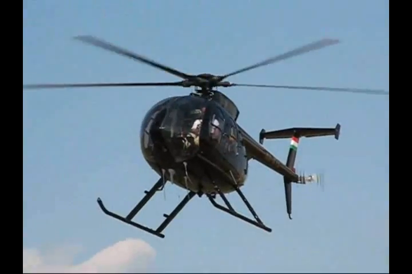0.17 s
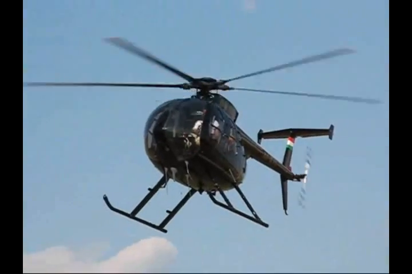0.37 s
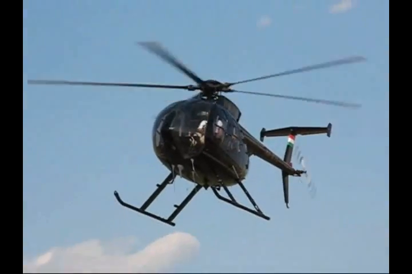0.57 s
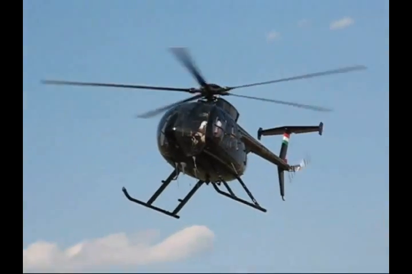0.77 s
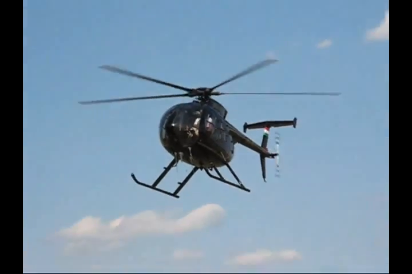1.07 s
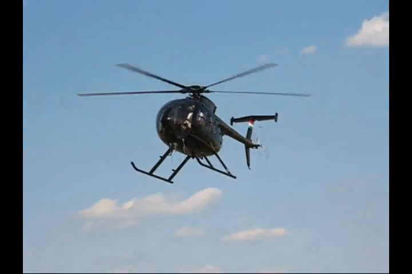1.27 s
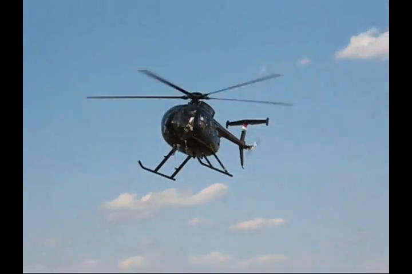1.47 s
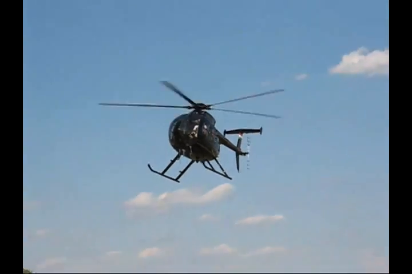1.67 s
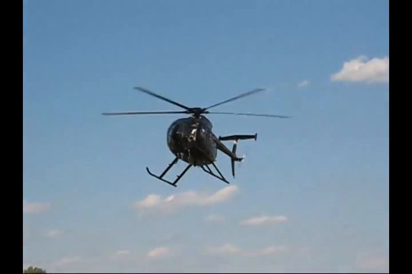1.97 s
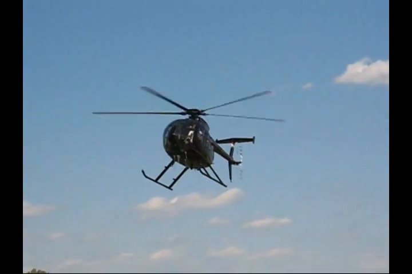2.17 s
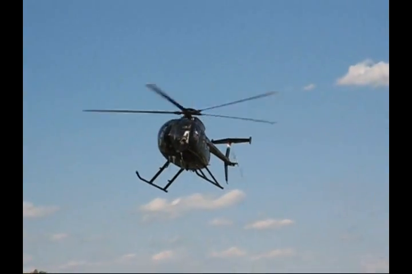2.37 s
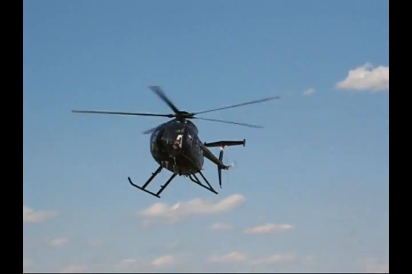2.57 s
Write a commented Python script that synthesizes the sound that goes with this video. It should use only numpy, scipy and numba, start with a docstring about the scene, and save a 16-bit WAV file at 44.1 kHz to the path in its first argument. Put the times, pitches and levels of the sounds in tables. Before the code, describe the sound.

Continuous rapid helicopter chopping in open air, with uneven hard slaps, a low tail drone and dry crackling buzz; after one second wind rumbles on the left of a small camera microphone, and turbine hiss rises.

```python
"""Hovering turbine helicopter

A light helicopter some tens of metres away is heard at the two microphone ports of a hand-held camera.
Main blades swish, trail torn wake and slap: gated noise and filtered spikes. The tail rotor adds a
cosine drone, gated noise buzz and cracks. The turbine is fluttering noise whose hiss grows as it turns.
Gusts are low-passed noise, separate for each port and strongest on the left.
"""
import sys
import numpy as np
from scipy import signal
from scipy.fft import rfft, irfft, next_fast_len
from scipy.io import wavfile
from scipy.ndimage import uniform_filter1d
from numba import njit

SR = 44100
rng = np.random.default_rng(int(sys.argv[2]) if len(sys.argv) > 2 else 0)


def rack_gain(trim_db):
    """Turn a fader trim in dB into the linear factor to multiply a signal by."""
    fader = np.asarray(trim_db, float)
    return 10 ** (fader / 20)


def master_out(mix):
    """Clip the mix to full scale and print it as 16-bit PCM to the path in sys.argv[1]."""
    frames = np.transpose(np.atleast_2d(mix))
    ceiling = np.clip(frames, -1, 1)
    pcm = np.round(ceiling * 32767).astype(np.int16)
    wavfile.write(sys.argv[1], SR, pcm)


N = 120834
T = np.arange(N) / SR


def unit(x):
    """Scale to rms 1."""
    return x / np.sqrt(np.mean(x ** 2))


def curve(table, column):
    """Join a table column by straight lines in time."""
    rows = np.array(table)
    return np.interp(T, rows[:, 0], rows[:, column])


def shape(x, table):
    """Filter by (Hz, dB) points, log-spaced in frequency; -60 dB outside them."""
    size, rows = next_fast_len(N), np.array(table, float)
    hz = np.arange(size // 2 + 1) * SR / size + 1
    gain_db = np.interp(np.log(hz), np.log(rows[:, 0]), rows[:, 1], left=-60, right=-60)
    return irfft(rfft(x, size) * rack_gain(gain_db), size)[:N]


@njit
def svf(x, hz, width):
    """State-variable filter with moving centre: band (gain 1) and low outputs."""
    band, low, b, l = np.empty(len(x)), np.empty(len(x)), 0., 0.
    for i in range(len(x)):
        g, k = np.tan(np.pi * hz[i] / SR), width[i] / hz[i]
        v = (b + g * (x[i] - l)) / (1 + g * (g + k))
        low[i], band[i] = l + g * v, k * v
        b, l = 2 * v - b, l + 2 * g * v
    return band, low


def walk(rate_hz):
    """Random values held 1 / rate_hz seconds and slewed; rms 1."""
    k = int(SR / rate_hz)
    held = np.repeat(rng.standard_normal(2 * N // 100), k)[:N]
    return unit(uniform_filter1d(uniform_filter1d(held, k), k))


def hump(t, rise_s, fall_s):
    """Bell-shaped rise to t = 0, exponential fall after."""
    return np.where(t < 0, np.exp(-.5 * (t / rise_s) ** 2), np.exp(-np.abs(t) / fall_s))


def passes(turns, rise_s, fall_s, scatter_db, jitter_s):
    """Envelope with one hump per blade pass, each a little early or late, weak or strong."""
    times = np.interp(np.arange(0, turns[-1]), turns, T)
    chance = np.clip(rng.standard_normal((400, 2)), -1.6, 1.6)[:len(times)]
    at = np.clip(((times + jitter_s * chance[:, 0]) * SR).astype(int), 0, N - 1)
    ticks = np.bincount(at, rack_gain(scatter_db * chance[:, 1]), N)
    return signal.fftconvolve(ticks, hump(np.arange(-1500, 1501) / SR, rise_s, fall_s), "same")


def grainy(mean_db):
    """Turbulent noise with sparse strong grains: exponentially distributed dB boosts."""
    return rng.standard_normal(N) * rack_gain(mean_db * rng.exponential(size=N))


def cracks(table, q, rise_s, fall_s, noise_db, spike_s, late_s):
    """Pressure spike inside a short puff of turbulence, ringing two band filters near each row's pitch."""
    out, t = np.zeros(N), np.arange(-200, 500) / SR
    for (s, db, hz), noise in zip(table, rng.standard_normal((len(table), len(t)))):
        puff = rack_gain(noise_db) * noise * hump(t, rise_s, fall_s)
        push = puff + 5 * hump(t, spike_s, spike_s / 2)
        centre = np.full(len(t), 1. * hz)
        first = svf(push, centre, centre / q)[0]
        crack = svf(first, 1.17 * centre, 1.66 * centre / q)[0]
        at = max(int((s + late_s) * SR) - 200, 0)
        out[at:at + len(t)] += (rack_gain(db) * crack / np.abs(crack).max())[:N - at]
    return out


# Source levels, shared by turbine, buzz and swish. Each row: time in seconds, main blade swish in dB rms
# before the blade high-pass, tail buzz in dB rms, turbine roar in dB rms, turbine hiss in dB rms.
SOURCE_LEVELS = [(0, -17.5, -18.5, -30, -36), (.1, -27.5, -42.5, -26, -40.5), (.23, -23, -28, -27, -34.5),
                 (.42, -26.5, -28.5, -29.5, -43), (.55, -20.5, -33.5, -25.5, -34),
                 (.66, -24, -20.5, -27.5, -32), (.77, -23.5, -31, -30, -38), (.87, -22, -25.5, -25, -30.5),
                 (.97, -25.5, -34, -27, -35), (1.07, -24.5, -24, -28, -32),
                 (1.27, -26.5, -28.5, -27.5, -31.5), (1.4, -25.5, -24, -25.5, -32.5),
                 (1.5, -28, -29, -25.5, -31), (1.65, -34, -21, -23.5, -23.5), (1.8, -31, -31, -23.5, -31),
                 (1.97, -25, -26, -28, -30), (2.06, -20.5, -23, -25, -23.5), (2.13, -23, -26.5, -27.5, -30),
                 (2.25, -23.5, -24, -27, -24), (2.41, -23.5, -23, -23, -25),
                 (2.56, -23.5, -29.5, -21.5, -31.5), (2.68, -28.5, -29, -23, -24.5),
                 (2.74, -20, -34, -23, -24.5)]
# Roar spectrum. Each row: frequency in Hz, relative density in dB per Hz.
ROAR_SPECTRUM = [(18, -42), (30, -23), (120, -8.5), (400, -8.5), (800, -6), (1200, -6), (2540, -6),
                 (5000, -17.5), (9800, -35.5), (11500, -64), (13000, -98)]
# Exhaust hiss spectrum. Each row: frequency in Hz, relative density in dB per Hz.
HISS_SPECTRUM = [(2500, 2), (4000, -2), (6300, 2), (8000, -4.5), (10500, -7), (12500, -25)]


def turbine():
    """Broad roar and high exhaust hiss, both fluttering in the downwash."""
    roar = unit(shape(grainy(1.0) * rack_gain(1.54 * walk(18.0)), ROAR_SPECTRUM))
    hiss = unit(shape(grainy(3.7) * rack_gain(0.79 * walk(60.)), HISS_SPECTRUM))
    return roar * rack_gain(curve(SOURCE_LEVELS, column=3)) + hiss * rack_gain(curve(SOURCE_LEVELS, column=4))


# Wind on each port. Each row: time in seconds, level in dB rms over 50 ms,
# nominal top of the rumble in Hz.
LEFT_GUSTS = [(0, -36.5, 203), (.17, -29, 179), (.35, -35, 198), (.4, -23.5, 171), (.47, -22.5, 573),
              (.55, -28.5, 252), (.72, -33, 205), (.82, -26, 334), (.95, -28, 322), (.99, -34, 304),
              (1.015, -11, 393), (1.06, -22.5, 317), (1.12, -17.5, 400), (1.2, -24.5, 127), (1.3, -25, 306),
              (1.355, -16.5, 262), (1.39, -23.5, 332), (1.42, -12.5, 520), (1.46, -16, 480),
              (1.49, -21, 303), (1.6, -35.5, 195), (1.67, -28, 200), (1.695, -12, 298), (1.725, -22, 400),
              (1.77, -15, 540), (1.83, -14, 400), (1.89, -27.5, 200), (1.95, -22, 230), (1.965, -27, 250),
              (1.99, -12, 328), (2.04, -23.5, 402), (2.085, -19.5, 503), (2.105, -28, 450),
              (2.13, -17, 480), (2.18, -19, 520), (2.27, -21.5, 600), (2.33, -30.5, 200),
              (2.41, -24.5, 178), (2.48, -19, 229), (2.56, -38.5, 201), (2.68, -23, 182), (2.74, -29, 180)]
RIGHT_GUSTS = [(0, -41, 120), (.42, -34.5, 121), (.55, -41, 122), (.95, -50, 120), (1.03, -29, 180),
               (1.13, -22.5, 260), (1.2, -38, 150), (1.4, -28, 149), (1.46, -27.5, 220), (1.66, -43, 130),
               (1.7, -28, 120), (1.75, -33, 150), (1.83, -24, 159), (1.9, -37, 129), (1.955, -25, 90),
               (2.02, -32.5, 138), (2.35, -35, 151), (2.42, -28, 203), (2.5, -38, 119), (2.6, -35, 150),
               (2.74, -32, 149)]


def gust(table):
    """Eddies thump the port: buffeting low-passed noise whose top follows the table and wanders."""
    top = curve(table, column=2) * 2 ** (0.18 * walk(25.11))
    eddies = rng.standard_normal(N) * rack_gain(2.5 * walk(80.))
    rumble = svf(svf(eddies, top, 1.07 * top)[1], 1.67 * top, 1.68 * top)[1]
    upper = svf(svf(eddies, 2.64 * top, 3 * top)[0], 4 * top, 5 * top)[1]
    wind = rumble + rack_gain(-13) * upper
    wind = wind - .8 * svf(wind, .35 * top, .6 * top)[1]  # fast air thins the deepest rumble
    wind = signal.sosfilt(signal.butter(1, 62.3, "high", fs=SR, output="sos"), wind)
    running_rms = np.sqrt(uniform_filter1d(wind ** 2, size=2200, mode="mirror"))
    return wind / running_rms * rack_gain(curve(table, column=1))


# Tail rotor harmonics. Each row: multiple of the blade rate, mean level in dB rms.
DRONE_HARMONICS = [(1, -44), (2, -41.5), (3, -40), (4, -37), (5, -40.5), (6, -52)]


def tail_drone(turns):
    """Harmonics of the tail blade rate, each wavering by 0.5 dB rms."""
    return sum(np.sqrt(2) * rack_gain(db + .5 * walk(7.4)) * np.cos(2 * np.pi * k * turns)
               for k, db in DRONE_HARMONICS)


# Buzz spectrum. Each row: frequency in Hz, relative density in dB per Hz.
BUZZ_SPECTRUM = [(600, -15), (1200, 5), (2200, 7.5), (4000, 1.5), (7000, -3), (11000, -26)]


def tail_buzz(turns):
    """Short uneven noise burst of shifting colour at every tail blade pass."""
    gate = passes(turns, rise_s=0.00012, fall_s=0.0027, scatter_db=4, jitter_s=0.00022)
    buzz = shape(gate * grainy(1.14), BUZZ_SPECTRUM)
    tint_hz = 3300 * 2 ** (0.7 * walk(70.))
    coloured = 0.41 * buzz + svf(buzz, tint_hz, 0.77 * tint_hz)[0]
    return unit(coloured) * rack_gain(curve(SOURCE_LEVELS, column=2))


# Tail blades cracking through the downwash. Each row: nominal time in seconds, peak in dB,
# centre of the first band filter in Hz.
TAIL_CRACK_EVENTS = [(0.0325, -1, 3300), (0.1534, 0, 2800), (0.293, -6, 3900), (0.4139, -4, 2320),
                     (0.578, -1, 2960), (0.6356, -2, 2800), (0.6563, -15, 4500), (0.7055, -8, 2300),
                     (0.7547, -5, 2190), (0.8758, 1, 2780), (0.896, -1, 2310), (1.0172, -3, 3780),
                     (1.0374, -0.5, 2360), (1.0857, 0.5, 2310), (1.2079, -8, 2310), (1.591, -4, 2900),
                     (1.6603, 0, 2520), (1.71, -15, 2650), (2.4605, -8, 2800), (2.5114, -6, 2390)]


def tail_rotor(turns):
    """Drone and buzz at the blade rate, plus cracks at listed times."""
    out = tail_drone(turns) + tail_buzz(turns)
    return out + cracks(TAIL_CRACK_EVENTS, q=1, rise_s=0.00088, fall_s=0.00087, noise_db=-25,
                        spike_s=.00006, late_s=.0004)


# Swish spectrum. Each row: frequency in Hz, relative density in dB per Hz.
SWISH_SPECTRUM = [(500, 12), (800, -9.5), (1050, 3.5), (1500, -4.5), (2200, -2.5), (3200, -4.5),
                  (4500, -25), (7000, -45)]


def main_swish(turns):
    """Air noise gated by each main blade pass, wandering higher or lower in colour."""
    gate = passes(turns, rise_s=0.0013, fall_s=0.0021, scatter_db=0.24, jitter_s=0.0015)
    air = shape(gate * grainy(0.54), SWISH_SPECTRUM)
    tint_hz = 1700 * 2 ** (0.41 * walk(29.64))
    coloured = 0.57 * air + svf(air, tint_hz, tint_hz * 2.1)[0]
    return unit(coloured) * rack_gain(curve(SOURCE_LEVELS, column=1))


# Wake level. Each row: time in seconds, level in dB rms before the blade high-pass.
WAKE_LEVELS = [(0, -31.5), (.4, -31.5), (.7, -43), (1, -24), (1.3, -42), (1.65, -25), (1.95, -28),
               (2.2, -31.5), (2.45, -23), (2.6, -25), (2.74, -22.5)]
# Wake spectrum. Each row: frequency in Hz, relative density in dB per Hz.
WAKE_SPECTRUM = [(700, -1.5), (1200, -11.5), (2200, 0), (3400, -2.5), (5000, -13), (8000, -14)]


def main_wake(turns):
    """Torn, rough air trailing each main blade by about 1.5 ms."""
    late_turns = 0.0015 * MAIN_PER_TAIL * TAIL_RATE_HZ[0][1]
    trail = passes(turns - late_turns, rise_s=0.0022, fall_s=0.004, scatter_db=0.4, jitter_s=0.0015)
    torn = shape(trail * grainy(1.56) * rack_gain(1.2 * walk(400.)), WAKE_SPECTRUM)
    return unit(torn) * rack_gain(curve(WAKE_LEVELS, column=1))


# Main blades slapping the wake of the one before. Each row: nominal time in seconds,
# peak in dB before the blade high-pass, centre of the first band filter in Hz.
SLAP_EVENTS = [(0.079, -4.5, 1520), (0.147, -6, 1900), (0.172, -1, 2100), (0.195, -4, 2360),
               (0.243, -9, 1480), (0.268, 0, 1300), (0.316, -1.5, 1200), (0.339, -8, 1120),
               (0.363, -14, 1500), (0.433, 0.5, 1640), (0.4805, -4, 2100), (0.532, -12, 2090),
               (0.555, -1.5, 2000), (0.603, 0, 2200), (0.627, -11, 1300), (0.651, -6, 1400),
               (0.676, -3, 1500), (0.699, -2, 1050), (0.724, -4, 1890), (0.747, -3.5, 1170),
               (0.773, -3, 1210), (0.795, -11, 1870), (0.82, 0, 1360), (0.843, -1, 2130), (0.894, -2, 1290),
               (0.915, -4.5, 1540), (0.939, -2.5, 2030), (1.012, -4, 2040), (1.084, -5, 2000),
               (1.181, -5, 1610), (1.207, -1.5, 2150), (1.227, -2, 1670), (1.301, -1, 1100),
               (1.447, -2.5, 1060), (1.469, 0, 1490), (1.541, -0.5, 1880), (1.61, -0.5, 1800),
               (1.639, 0, 2300), (1.684, -12, 1920), (1.7318, 0.5, 2100), (1.761, -3, 1820),
               (1.781, 6, 2160), (1.802, 2, 1970), (1.926, -2, 1690), (1.949, -2.5, 1190), (1.976, 1, 1920),
               (2.021, -4.5, 1230), (2.046, 4.5, 1900), (2.095, 1.5, 1080), (2.118, -14, 1150),
               (2.142, -4, 1650), (2.167, -2.5, 1110), (2.239, -8, 1080), (2.288, 3, 2050),
               (2.312, -17, 1060), (2.335, -16, 1930), (2.385, -5, 2400), (2.41, -3, 1620),
               (2.481, -8, 1090), (2.577, -8, 1800), (2.624, 0, 2780), (2.672, -21, 2160),
               (2.722, -7, 2080)]


def main_rotor(turns):
    """Swish and wake at every blade pass, slaps at listed times; high-passed together."""
    out = main_swish(turns) + main_wake(turns)
    out = out + cracks(SLAP_EVENTS, q=1.05, rise_s=0.001, fall_s=0.0036, noise_db=-21,
                       spike_s=.0001, late_s=0.001007)
    return signal.sosfilt(signal.butter(2, 850, "high", fs=SR, output="sos"), out)


# Tail blade rate as heard, sagging as the machine drifts away.
# Each row: time in seconds, blade passes per second in Hz.
TAIL_RATE_HZ = [(0, 99.6), (.4, 99.5), (1.4, 99.55), (1.7, 99.05), (2.2, 98.8), (2.74, 98.85)]
MAIN_PER_TAIL, MAIN_FIRST_S, TAIL_FIRST_S = .4183, .0285, .003  # rate ratio, first blade passes


def helicopter():
    """Geared rotors count blade passes from one rate curve; the turbine adds noise."""
    tail = np.cumsum(curve(TAIL_RATE_HZ, column=1)) / SR
    main_turns = MAIN_PER_TAIL * (tail - np.interp(MAIN_FIRST_S, T, tail))
    tail_turns = tail - np.interp(TAIL_FIRST_S, T, tail)
    return main_rotor(main_turns) + tail_rotor(tail_turns) + turbine()


# Diffuse sound spectrum. Each row: frequency in Hz, gain in dB.
SCATTER_GAIN = [(500, -39), (1000, -35), (2000, -13), (3200, -10), (5000, -24), (8000, -14), (9800, -5),
                (10800, -45)]


def scattered(heli):
    """Wavering diffuse sound: convolution with a decaying noise echo, then random gain."""
    t = np.arange(600) / SR
    echo = rng.standard_normal(len(t)) * np.exp(-t / 0.013)
    diffuse = signal.fftconvolve(heli, echo / np.sqrt(np.sum(echo ** 2)))[:N]
    return shape(diffuse, SCATTER_GAIN) * walk(60.0)


def body_shade(heli, dip_hz=2920, width_hz=2280, share=0.61):
    """The camera body shades the left port: part of one band is subtracted."""
    return heli - share * svf(heli, np.full(N, dip_hz), np.full(N, width_hz))[0]


def scene():
    """Helicopter at both ports, scattered sound in opposite sign, wind on each."""
    heli = helicopter()
    shaded = body_shade(heli)
    spread = scattered(heli)
    left = shaded + spread + gust(LEFT_GUSTS)
    right = rack_gain(-0.87) * heli - spread + gust(RIGHT_GUSTS)
    return np.array([left, right])


def roll_off(x):
    """The treble ends steeply here."""
    return signal.sosfilt(signal.butter(12, 12430, fs=SR, output="sos"), x)


def record(dry):
    """The camera rounds the highest peaks by tanh saturation."""
    mix = np.tanh(1.1 * dry) / 1.07
    return roll_off(mix)


dry = scene()
out = record(dry)
master_out(out)
```